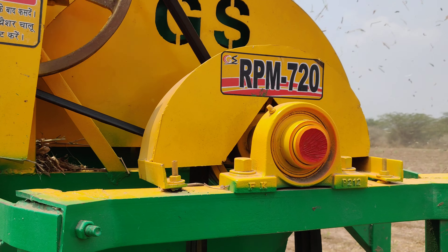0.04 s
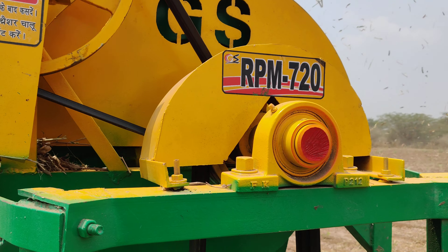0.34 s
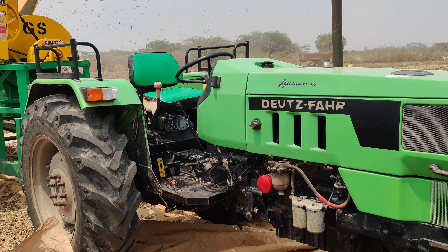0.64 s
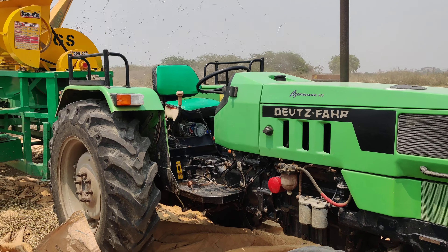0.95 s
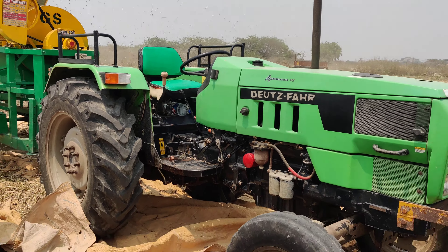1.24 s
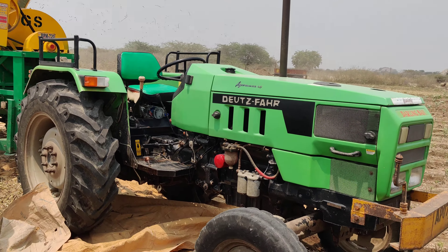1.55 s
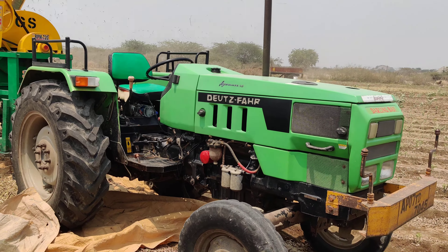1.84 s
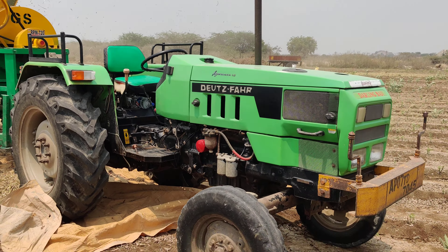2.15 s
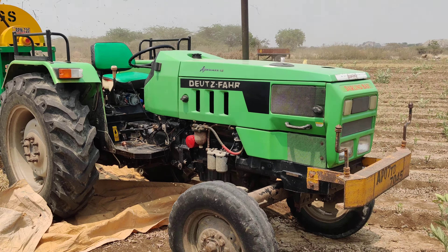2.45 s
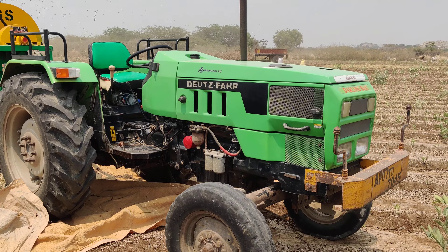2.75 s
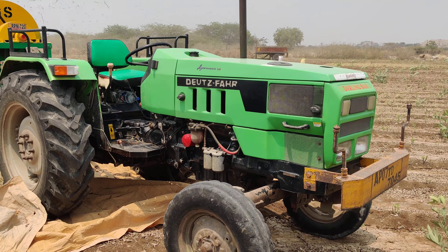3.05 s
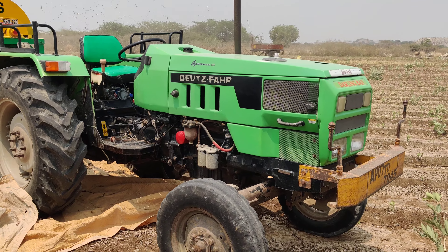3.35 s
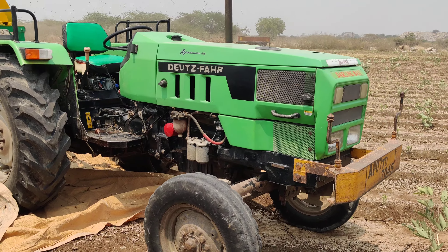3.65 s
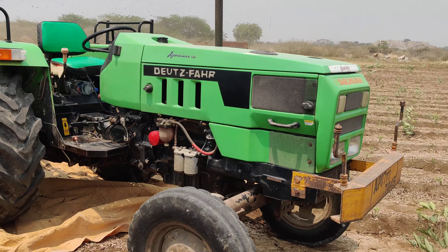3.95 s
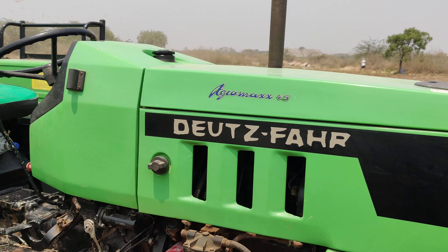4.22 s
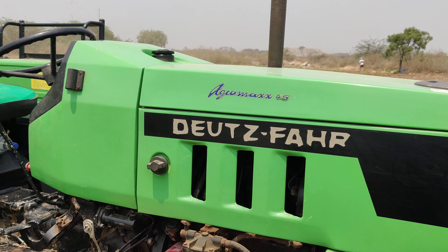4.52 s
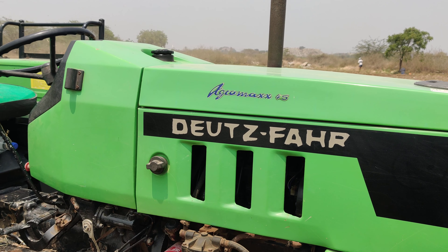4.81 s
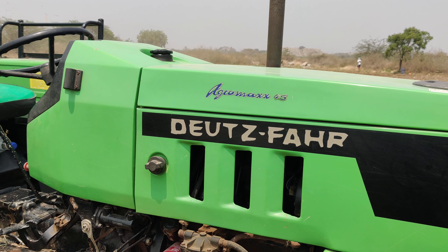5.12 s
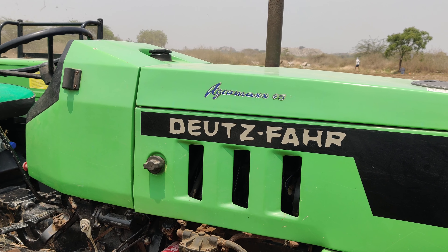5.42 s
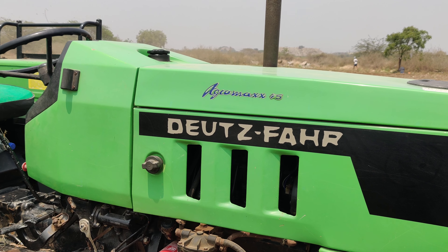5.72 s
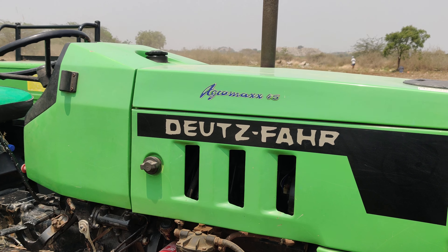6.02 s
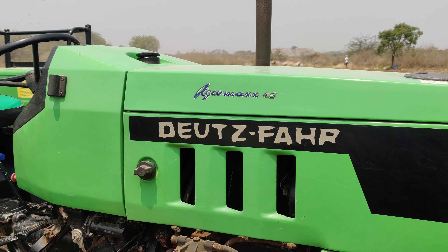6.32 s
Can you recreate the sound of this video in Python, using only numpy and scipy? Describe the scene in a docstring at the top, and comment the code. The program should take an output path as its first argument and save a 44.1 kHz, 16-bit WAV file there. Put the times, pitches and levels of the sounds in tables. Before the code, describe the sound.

A diesel tractor drives a thresher in an open field. For a moment the microphone is close to the humming drum and the hiss of straw and air. Then the engine's rapid knocking and metallic clatter come forward, with the hum pulsing against the exhaust. In the last part, heard from beside the bonnet, a gear whine swells. Small metal chinks and a few dull thumps come through.

```python
"""A three-cylinder diesel tractor drives a thresher in an open field, on a stereo microphone.
We open close to the drum bearing, in the hum of the drum and the hiss of straw and air. From 0.33 s we
stand in front of the tractor: the diesel knocks, its block rings, the soil throws back a dull echo, and
the hum beats against the exhaust about four times a second. From 3.85 s we are beside the bonnet,
where a gear whines and swells towards the end."""
import sys
import numpy as np
from scipy import signal
from scipy.fft import rfft, irfft, next_fast_len
from scipy.io import wavfile
from scipy.ndimage import uniform_filter1d

SR = 44100
rng = np.random.default_rng(int(sys.argv[2]) if len(sys.argv) > 2 else 0)


def unload_audio(sound):
    """Save the sound as a 16-bit wav file, at the path given as the first command line argument."""
    columns = np.transpose(np.atleast_2d(sound))
    # keep every value between -1 and 1, then stretch to whole-number steps
    steps = np.round(np.clip(columns, -1, 1) * 32767)
    wavfile.write(sys.argv[1], SR, steps.astype(np.int16))


N = 289737
T = np.arange(N) / SR

# The three microphone positions. Each holds:
#   starts: time in seconds of a first-cylinder firing, then of a drum beat
#   exhaust, drum: level in dB of each harmonic, from the first (exhaust) or the second (drum)
#   roar, hiss: spectra. Each row: frequency in Hz, relative density in dB.
#   rumble_db, roar_db, hiss_db: base levels of those layers
#   knock: Each row: frequency in Hz, share of the power that comes in knocks (held to 0-1).
#   knock_s: rise and decay of a knock in seconds
#   rings: block modes. Each row: cylinder, lag after its firing in seconds, pitch in Hz, level in dB.
#   balance: Each row: frequency in Hz, left over right in dB.
AT_DRUM = dict( starts=(.0086, .0239), exhaust=[-42, -25, -37, -42, -43, -39, -47, -42],
           drum=[-14, -31, -25, -40, -29, -41, -31, -38, -35, -40, -23],
           rumble_db=-30, roar_db=-21, hiss_db=-24, roar=[(120, -40), (200, -9), (321, -6.5), (398, -7.5),
           (554, -11), (1100, -8.5), (1260, -16.5), (3400, -17.5), (4420, -56), (7480, -120)],
           hiss=[(1590, -2.5), (2700, -4), (3170, -21), (3620, 4), (4020, 0), (4290, -4), (4690, 6),
           (5680, 1.5), (6380, 4.5), (7130, 0), (7290, 0), (8260, -2), (9640, -8), (14200, -13),
           (15700, -14)], knock=[(200, 0), (1000, -0.9), (2200, 0.24), (6000, -1)], knock_s=(0.0045, 0.012),
           rings=[(0, 0.001, 910, -16), (1, 0.0035, 1050, -25), (2, 0.0041, 865, -22)], balance=[(60, 0.5),
           (110, -3), (200, 1), (380, 1), (700, 4), (1290, 2), (2380, 1), (4400, 0), (8120, -9),
           (15000, 3)])
IN_FRONT = dict( starts=(.3715, .3545), exhaust=[-32, -23, -34.5, -38, -35, -36, -35, -44],
            drum=[-16.5, -32, -25, -41, -30, -44, -41, -42, -46, -44, -37],
            rumble_db=-25.5, roar_db=-22.5, hiss_db=-23.5, roar=[(120, -22), (240, -9), (310, 0.5),
            (530, 1), (615, -3), (720, -1), (900, -6.5), (1250, -10.5), (1430, -17.5), (1800, -17),
            (2250, -15.5), (3000, -21.5), (3500, -20), (5000, -38)], hiss=[(700, -26), (1590, -8),
            (2700, -10.5), (3130, -12.5), (3810, -6.5), (4290, -12.5), (5080, -1.5), (5590, -10.5),
            (6200, -2.5), (6530, -1), (8260, -9.5), (9430, -16.5), (11200, -21.5), (14100, -23),
            (15700, -46)], knock=[(200, 0.092), (550, 0.26), (1000, 0.25), (2200, 0.34), (3600, 0.049),
            (5200, 0.087), (8000, 0.027)], knock_s=(0.00062, 0.013), rings=[(0, -.002, 385, -23.5),
            (0, 0, 724, -19), (0, 0, 1296, -18), (0, -.001, 2160, -23), (0, .003, 1640, -25),
            (0, 0.0054, 1650, -22), (0, .007, 1190, -26.5), (1, -0.0056, 778, -20.5),
            (1, -.003, 920, -24.5), (1, -0.00014, 1050, -20.5), (1, 0.005, 1450, -26),
            (1, 0.015, 1320, -45), (2, -.0015, 903, -22), (2, 0, 2140, -22), (2, -0.0048, 1290, -33),
            (2, .0005, 1710, -25), (2, 0.005, 2490, -25), (2, 0.017, 1183, -26.5)], balance=[(200, 3),
            (450, -0.5), (1290, 3.5), (2400, 8), (3600, -4), (5200, 6.5), (6400, -18), (8100, -9),
            (9300, -4.5), (15000, 0)])
AT_BONNET = dict( starts=(3.8661, 3.888), exhaust=[-34, -24.5, -32.5, -31.5, -29, -28, -26.5, -36],
             drum=[-18, -33, -25, -41, -32, -45, -43, -43, -35.5, -47, -38],
             rumble_db=-27.5, roar_db=-22, hiss_db=-23.5, roar=[(140, -11), (230, -7.5), (310, -0.5),
             (420, -8), (540, -4), (780, -3.5), (950, -4.5), (1180, -7.5), (1350, -10), (1750, -10.5),
             (2400, -7.5), (2900, -13.5), (3500, -16), (5000, -51)], hiss=[(1590, -15), (2700, -54),
             (2880, -23), (3650, -3), (4110, -7), (5160, 4), (6020, -6.5), (6380, -3), (7290, 3), (7670, 0),
             (8630, -10.5), (9930, -7), (13300, -19), (15100, -21), (15700, -33)], knock=[(200, 0.11),
             (550, 0.41), (1000, 0.48), (2200, 0.31), (3600, 0.047), (5200, 0.22), (8000, 0.11)],
             knock_s=(0.0065, 0.018), rings=[(0, 0.00036, 1640, -41), (0, 0.00099, 1010, -18),
             (0, -.003, 1210, -26), (0, 0, 2080, -33), (0, 0, 2350, -31), (0, .003, 692, -20),
             (0, .007, 1450, -23), (0, 0.0019, 5040, -23), (1, -.009, 1144, -19.5), (1, -.003, 1100, -24),
             (1, -.003, 610, -29), (1, 0.000065, 1604, -24), (1, -0.0035, 1940, -21), (1, 0, 2420, -25),
             (1, .002, 5000, -21), (1, .006, 1110, -26), (2, -.004, 650, -30), (2, -.002, 2680, -28),
             (2, 0, 1540, -25), (2, -0.01, 5200, -36), (2, 0.0028, 2210, -28), (2, .0035, 1203, -15.5)],
             balance=[(200, 0), (700, 2.5), (2700, 3), (3700, -3.5), (5100, 6.5), (7100, -19), (7900, -6),
             (8650, -12), (9700, -10.5), (15000, 3)])
# Times in seconds that bound our stay at the three positions.
POSITION_EDGES = [0, .328, 3.85, 6.58]
# The microphone's two ports. Each row: frequency in Hz, correlation, lead of the left in radians.
PORT_LIKENESS = [(60, 0.73, 0.5), (320, 0.95, 0), (617, 0.54, 0.2), (1180, 0.61, 0.8), (1460, .2, -3),
                 (2100, 0.29, -1.86), (2580, 0.24, 1), (3400, 0.13, 4), (5100, 0.25, 5.5), (6900, 0.36, 11),
                 (8100, 0.18, 14), (10000, .08, 19), (15300, .05, 23.5)]
# Soil echo in front. Each row: time in seconds, lowest cancelled frequency in Hz, strength from 0 to 1.
GROUND_ECHO = [(.33, 503, .62), (1.15, 535, .5), (1.3, 585, .8), (2.2, 620, .82), (2.8, 610, .78),
               (3.3, 575, .86), (3.84, 570, .56)]
# Loose metal. Each row: time in seconds, level in dB.
CHINKS = [(.406, -21), (.513, -25), (1.362, -27), (3.29, -22), (3.393, -27), (4.003, -21), (4.28, -21),
          (5.25, -20), (5.715, -23), (6.46, -23)]
# The band it rings in. Each row: frequency in Hz, relative density in dB.
CHINK_SPECTRUM = [(4200, -35), (4850, -5), (5100, 7), (5350, -3), (5900, -41)]
# Dull thumps. Each row: time in seconds, pitch in Hz, peak level in dB.
THUMPS = [(3.55, 342, -11), (4.336, 167, -12), (5.128, 183, -11)]
# Chirps and hums of the drum drive. Each row: centre and length in seconds, pitch in Hz, level in dB.
DRIVE_CHIRPS = [(0.049, 0.046, 553, -20.5), (0.174, 0.067, 555, -18.5), (0.267, 0.067, 573, -24),
                (0.309, 0.039, 557, -21), (4.08, 0.62, 791, -30.5), (4.151, 0.56, 573, -39),
                (4.35, 0.6, 1153, -37), (4.876, 0.13, 783, -28)]
# Wads of stalks and gaps between them. Each row: centre and width in seconds, change of hiss in dB.
STRAW_WADS = [(1.362, 0.062, 5), (1.887, 0.088, 2), (2.347, 0.27, 2), (3.01, 0.075, -1), (3.12, 0.099, 2.5),
              (3.756, 0.13, -2), (6.026, 0.062, -3), (6.507, 0.076, -4.5)]
# Top of the hiss, higher as the microphone faces the thresher. Each row: time in seconds, gain in dB.
CHAFF_LEVEL = [(0, 0), (.32, 1.5), (.35, 2), (.62, 1.5), (.69, -.5), (.95, 1.5), (1.6, -0.5), (1.9, 2),
               (2.3, -2.5), (2.9, -3), (3.17, -2), (3.38, -5), (3.82, -1), (3.9, -1), (4.65, -0.1),
               (5.13, 0.3), (5.24, -1), (5.45, 0.5), (6.25, -2), (6.57, -3)]
# The gear's whine beside the bonnet, then the rush around it. Each row: time in seconds, level in dB.
WHINE_LEVEL = [(3.87, -34), (4.15, -34.5), (4.4, -31), (4.9, -30), (5.25, -32.5), (5.75, -31.5),
               (6.08, -26), (6.35, -22), (6.57, -29)]
GEAR_RUSH_LEVEL = [(3.87, -37), (5.1, -37), (5.8, -30), (6.1, -30), (6.38, -23), (6.57, -33)]
# Colour of that rush, then of the engine's rumble. Each row: frequency in Hz, relative density in dB.
GEAR_RUSH_SPECTRUM = [(380, -40), (490, -9), (535, 7), (595, 3), (680, -4), (900, -24)]
RUMBLE_SPECTRUM = [(8, -16), (20, -8), (38, -3), (70, 8), (130, -1), (200, -3.5), (280, -6), (600, -42.5)]
# Engine speed, one list a position. Each row: time in seconds, firings per second.
FIRING_RATE = [
    [(0.0, 29.0529), (0.32, 29.0538)],
    [(0.33, 28.1914), (1.0, 28.3537), (2.0, 28.4749), (3.0, 28.6427), (3.84, 28.7783)],
    [(3.86, 29.1909), (4.4, 28.1338), (5.0, 27.8147), (5.6, 27.8617), (6.1, 27.9805), (6.57, 28.0921)],
]
# Engine noise. Each row: frequency in Hz, share of the power that is alike in every cycle.
CYCLE_SHARE = [(60, .2), (150, .35), (300, .5), (600, .6), (1200, .42), (2200, .42), (4000, .14),
               (8000, .04)]
# Relative strength of each cylinder's knock in dB.
CYLINDER_DB = [1.5, 1, 3]
# Lulls and surges in the knocking. Each row: centre and width in seconds, change in dB.
KNOCK_SWELLS = [(1.23, 0.29, -2), (2.162, 0.073, -4.5), (3.02, 0.074, -5), (3.45, 0.41, 0.2),
                (3.747, 0.072, -1.5), (4.915, 0.15, 0.9), (5.12, 0.11, 3.8), (6.14, 0.098, 1.7)]
# Clatter as the microphone moves along the engine. Each row: time in seconds, gain in dB.
CLATTER_LEVEL = [(.32, -2), (.35, 0), (1, 0), (1.6, -1), (2.4, 0), (3.3, -0.2), (3.8, 0.5), (4.1, 0),
                 (4.6, -0.5), (5.2, -2), (5.7, -0.3), (6.15, 0.5), (6.57, 1)]

CYLINDERS = len(CYLINDER_DB)
JITTER_S, JITTER_HZ = .0002, 6  # the firings come slightly early or late


def amp(db):
    """Decibels to gain."""
    return 10 ** (np.asarray(db) / 20)


def unit(x):
    """Scales to rms 1."""
    return x / np.sqrt(np.mean(x ** 2) + 1e-20)


def at_hz(points, hz):
    """Reads a table on a log-frequency axis."""
    f, value = np.transpose(points)
    return np.interp(np.log(hz + 1), np.log(f + 1), value)


def at_time(points, t):
    """Reads a table along time."""
    return np.interp(t, *np.transpose(points))


def drift(t, hz):
    """Slow random wander of rms about 1, up to hz."""
    rates = hz * np.geomspace(1 / 10, 1, 20)
    coarse = t[::100]
    wander = np.sin(2 * np.pi * (rates[:, None] * coarse + rng.random((20, 1)))).sum(0)
    return np.interp(t, coarse, wander) / np.sqrt(10)


def swells(t, events):
    """Level in dB of brief, bell-shaped rises or dips."""
    return sum(db * np.exp(-(2 * (t - s) / width) ** 2) for s, width, db in events)


def ring(age, rise, t60):
    """Envelope of a struck part: a quick rise, then a steady decay."""
    return np.exp(-(np.minimum(age, 0) / rise) ** 2) * amp(-60 * np.maximum(age, 0) / t60)


def harmonics(t, turns, levels, first, in_step=False, waver=.07, waver_hz=22):
    """Harmonics of a repeating motion; the higher ones flutter more in level and phase."""
    out = np.zeros(len(t))
    for k, db in enumerate(levels, first):
        flutter = waver * k / 4
        offset = rng.random() * (k > 2 and not in_step)
        angle = 2 * np.pi * (k * turns + offset) + flutter * drift(t, waver_hz)
        out += amp(db) * (1 + flutter * drift(t, waver_hz)) * np.cos(angle)
    return np.sqrt(2) * out


def cyclic_noise(t, firings):
    """Two unrelated noises, each partly the same in every engine cycle."""
    size = next_fast_len(len(t), True)
    cycle = firings / CYLINDERS
    period = int(len(t) / (cycle[-1] - cycle[0]))
    one_cycle = irfft(np.exp(2j * np.pi * rng.random((period // 2 + 1, 2))).T, period)
    repeating = unit(one_cycle)[:, (cycle % 1 * period).astype(int) % period]
    fresh = rng.standard_normal((2, len(t)))
    alike = np.clip(at_hz(CYCLE_SHARE, np.fft.rfftfreq(size, 1 / SR)), 0, 1)
    blend = np.sqrt(alike) * rfft(repeating, size) + np.sqrt(1 - alike) * rfft(fresh, size)
    return irfft(blend, size)[:, :len(t)]


def noise_at_mic(pair, colour, balance, length):
    """Two unrelated spectra become coloured noise at the left and right ports, with a mid rms of 1."""
    size = next_fast_len(length, True)
    hz = np.fft.rfftfreq(size, 1 / SR)
    ports = np.array(PORT_LIKENESS)
    same, lead = np.clip(at_hz(ports[:, :2], hz), 0, 1), at_hz(ports[:, ::2], hz)
    side = amp(at_hz(balance, hz) / 2)
    mid = np.sqrt(side ** 2 + side ** -2 + 2 * same * np.cos(lead)) / 2
    right = (same * pair[0] + np.sqrt(1 - same ** 2) * pair[1]) * np.exp(-1j * lead)
    stereo = np.array([pair[0] * side, right / side]) / mid
    sound = irfft(stereo * amp(at_hz(colour, hz)), size)[:, :length]
    return sound / sound.mean(0).std()


def mode_at_mic(hz, balance, width=.77):
    """Complex gains of one mode at the left and right ports; their mean has size 1."""
    lead = at_hz(np.array(PORT_LIKENESS)[:, ::2], hz)
    side = amp(at_hz(balance, hz) / 2) * np.exp(.5j * width * np.clip(lead, -2, 2))
    return np.array([[side], [1 / side]]) / abs(side + 1 / side) * 2


def ground_echo(t, sound, blur_samples=13):
    """Soft soil sends the microphone a dull, slightly late copy that hollows the midrange."""
    s, notch_hz, strength = np.transpose(GROUND_ECHO)
    delay = 1 / (2 * np.interp(t, s, notch_hz))
    dull = uniform_filter1d(sound, blur_samples, axis=1)
    echo = np.array([np.interp(t - delay, t, side) for side in dull])
    both = sound + np.interp(t, s, strength) * echo
    return both * sound.mean(0).std() / both.mean(0).std()


def metal_chinks(t, balance):
    """Loose metal rattles now and then with a short bright ring."""
    noise = rfft(rng.standard_normal((2, len(t))), next_fast_len(len(t), True))
    envelope = sum(amp(db) * ring(t - s, rise=.003, t60=.08) for s, db in CHINKS)
    return envelope * noise_at_mic(noise, CHINK_SPECTRUM, balance, len(t))


def thumps(t, rise=.0065, t60=.024):
    """Single dull thumps from the machinery."""
    return sum(amp(db) * ring(t - s, rise, t60) * np.sin(2 * np.pi * (hz * (t - s) + rng.random()))
               for s, hz, db in THUMPS)


def drive_chirps(t, flutter=.43):
    """Short rough tones from the drum drive."""
    out = np.zeros(len(t))
    for s, length, hz, db in DRIVE_CHIRPS:
        swell = np.cos(np.pi * np.clip((t - s) / length, -.5, .5))
        out += amp(db) * swell * np.sin(2 * np.pi * hz * t + flutter * drift(t, hz=61))
    return np.sqrt(2) * out


def straw_hiss(t, hiss, chaff_hz=5800):
    """Straw feeds through unevenly; stalks and finer chaff clump separately, so the hiss is grainy."""
    feed = amp(.4 * drift(t, hz=3) + swells(t, STRAW_WADS))
    chaff = signal.sosfiltfilt(signal.butter(4, chaff_hz, "high", fs=SR, output="sos"), hiss)
    stalk_clumps, chaff_clumps = (unit(amp(-.2 * drift(t, hz=480) + 1.28 * drift(t, hz=55)))
                                  for _ in range(2))
    return feed * (stalk_clumps * (hiss - chaff) + chaff_clumps * amp(at_time(CHAFF_LEVEL, t)) * chaff)


def gear_rush(t, firings, throb=.25):
    """Beside the bonnet, the gear's rough rush swells and throbs a little with each firing."""
    pulses = unit(1 + throb * np.cos(2 * np.pi * firings))
    noise = rfft(cyclic_noise(t, firings) * pulses, next_fast_len(len(t), True))
    rush = noise_at_mic(noise, GEAR_RUSH_SPECTRUM, AT_BONNET["balance"], len(t))
    return amp(at_time(GEAR_RUSH_LEVEL, t)) * rush


def gear_whine(t, firings, teeth=28, flutter=.26, jolt=.18):
    """Teeth mesh on the crankshaft, which turns twice in three firings; each firing jolts them."""
    crank, beat = 2 * firings / CYLINDERS, 2 * np.pi * firings
    level = amp(at_time(WHINE_LEVEL, t)) * (1 + flutter * drift(t, hz=40) + jolt * np.cos(beat))
    angle = 2 * np.pi * teeth * crank + flutter * drift(t, hz=25) + jolt * np.sin(beat)
    return np.sqrt(2) * level * np.cos(angle)


def knocks(t, firings, rise, decay, valve_db=-11, valve_lag_s=.0138):
    """Envelope of the combustion knocks, each followed by a weaker valve tap."""
    power = np.zeros(len(t))
    for k in range(int(np.ceil(firings[0])), int(firings[-1]) + 1):
        at = np.interp(k, firings, t)
        near = slice(*np.searchsorted(t, [at - .02, at + .1]))
        for lag, db in ((0, CYLINDER_DB[k % CYLINDERS]), (valve_lag_s, valve_db)):
            age = t[near] - at - lag
            shape = np.exp(np.where(age < 0, -(age / rise) ** 2, -age / decay))
            power[near] += (amp(db + rng.standard_normal() / 10) * shape) ** 2
    return unit(np.sqrt(power))


def machine_noise(t, firings, place, load, clatter):
    """Rumble, roar and hiss: the knocks take a share of each band, the rush of fan and straw the rest."""
    size = next_fast_len(len(t), True)
    share = np.clip(at_hz(place["knock"], np.fft.rfftfreq(size, 1 / SR)), 0, 1)
    blows = rfft(cyclic_noise(t, firings) * clatter * knocks(t, firings, *place["knock_s"]), size)
    rush = rfft(cyclic_noise(t, firings), size)
    drive = np.sqrt(share) * blows + np.sqrt(1 - share) * rush
    rumble = noise_at_mic(drive, RUMBLE_SPECTRUM, balance=[(0, 0)], length=len(t))
    roar = noise_at_mic(drive, place["roar"], place["balance"], len(t))
    hiss = noise_at_mic(drive, place["hiss"], place["balance"], len(t))
    if place is IN_FRONT:
        roar = ground_echo(t, roar)
    return (amp(place["rumble_db"]) * rumble + amp(place["roar_db"]) * load * roar
            + amp(place["hiss_db"]) * straw_hiss(t, hiss))


def block_clank(t, firings, place, rise=.0014, scatter_db=.8, detune=.003):
    """Each cylinder's firing rings its own modes of the engine block, much alike in every cycle."""
    out = np.zeros((2, len(t)))
    for cylinder, lag, hz, db in place["rings"]:
        gains = mode_at_mic(hz, place["balance"])
        t60 = .041 * np.sqrt(1190 / hz)  # higher modes die sooner
        for k in range(round(cylinder), int(firings[-1]) + 1, CYLINDERS):
            at = np.interp(k, firings, t) + lag
            near = slice(*np.searchsorted(t, [at - .02, at + .1]))
            age = t[near] - at
            force, pitch = rng.standard_normal(2)
            shape = amp(db + scatter_db * force) * ring(age, rise, t60)
            out[:, near] += shape * (gains * np.exp(2j * np.pi * hz * (1 + detune * pitch) * age)).imag
    return ground_echo(t, out) if place is IN_FRONT else out


def exhaust(t, firings, place, lag_periods=.69):
    """The exhaust puffs after each knock, its harmonics all in step."""
    return harmonics(t, firings - lag_periods, place["exhaust"], first=1, in_step=True)


def drum_hum(t, firings, place, turns_per_firing=.9302):
    """The drum turns just under the firing rate, so its hum beats against the exhaust."""
    return harmonics(t, turns_per_firing * firings, place["drum"], first=2)


def scene():
    """The same machines from three microphone positions, joined by 5 ms crossfades."""
    out = np.zeros((2, N))
    for k, place in enumerate((AT_DRUM, IN_FRONT, AT_BONNET)):
        inside_s = np.minimum(T - POSITION_EDGES[k], POSITION_EDGES[k + 1] - T)
        fade = np.clip(.5 + 200 * inside_s, 0, 1)
        here = fade > 0
        t = T[here]
        count = np.cumsum(at_time(FIRING_RATE[k], t)) / SR
        firings, firings_since_beat = (count - np.interp(s, t, count) for s in place["starts"])
        tones = exhaust(t, firings, place) + drum_hum(t, firings_since_beat, place)
        tones += drive_chirps(t) + thumps(t)
        if place is AT_BONNET:
            tones += gear_whine(t, firings)
        load = amp(.3 * drift(t, hz=6) + swells(t, KNOCK_SWELLS))  # never quite steady
        clatter = amp(at_time(CLATTER_LEVEL, t))
        uneven_firings = np.interp(t + JITTER_S * drift(t, JITTER_HZ), t, firings)
        sound = tones * amp([[.3], [-.3]])  # a touch left of centre
        sound += load * clatter * block_clank(t, uneven_firings, place)
        sound += machine_noise(t, uneven_firings, place, load, clatter)
        sound += metal_chinks(t, place["balance"])
        if place is AT_BONNET:
            sound += gear_rush(t, uneven_firings)
        out[:, here] += sound * np.sin(np.pi / 2 * fade[here])
    return out


def record(dry, knee=.72, ceiling=.95, top_hz=15750):
    """After the microphone, the highest peaks are rounded off and the top treble is cut."""
    held = np.clip(dry, -knee, knee)
    headroom = ceiling - knee
    rounded = held + headroom * np.tanh((dry - held) / headroom)
    lowpass = signal.firwin(511, top_hz, window=("kaiser", 9), fs=SR)
    return signal.oaconvolve(rounded, lowpass[None], "same")


dry = scene()
out = record(dry)
unload_audio(out)
```